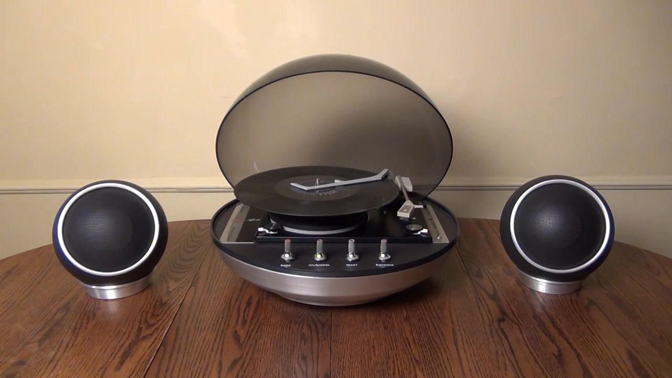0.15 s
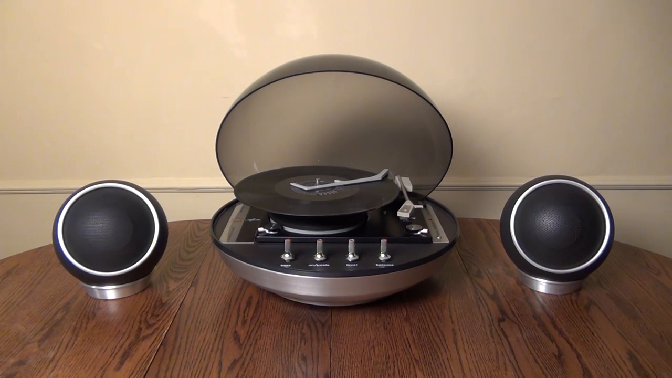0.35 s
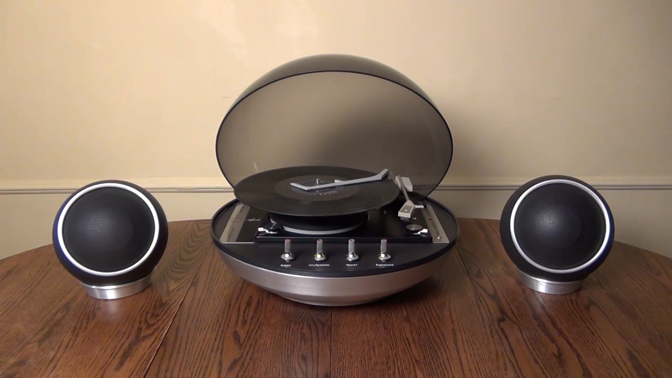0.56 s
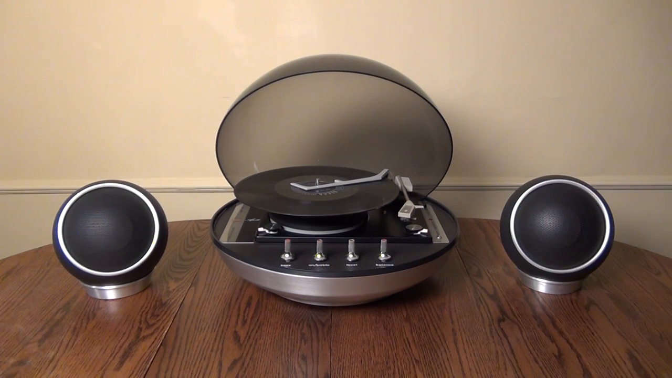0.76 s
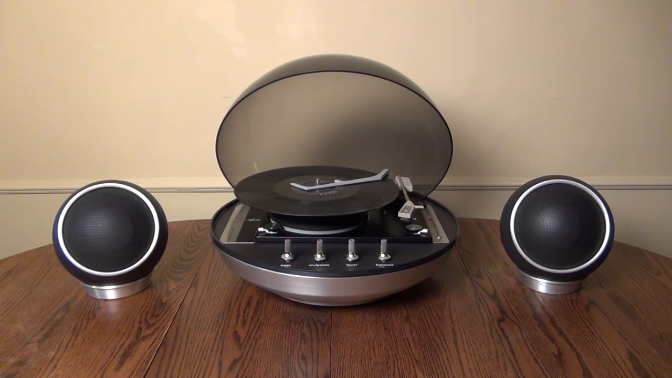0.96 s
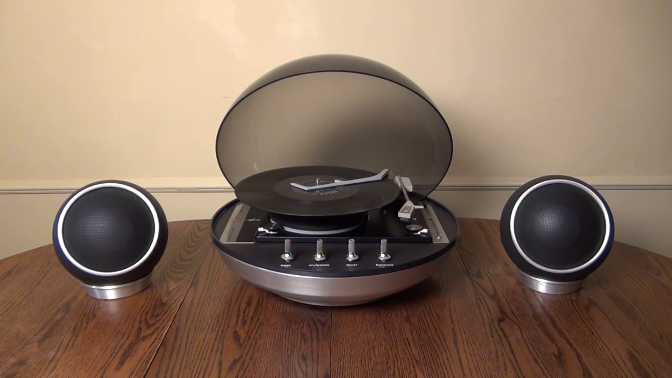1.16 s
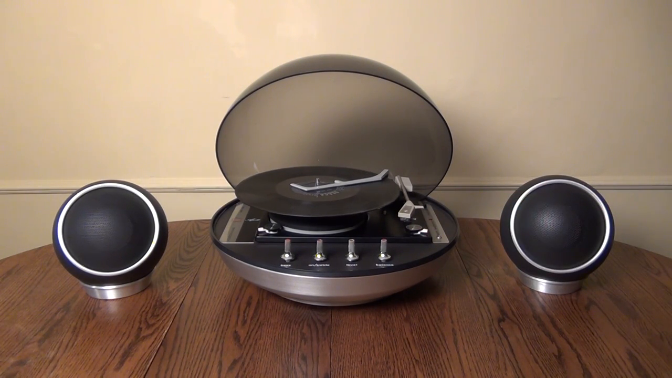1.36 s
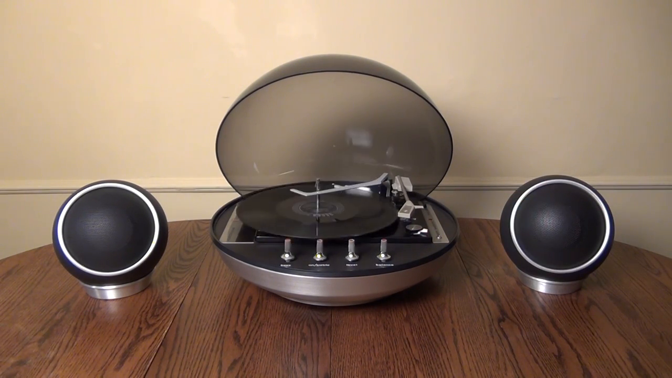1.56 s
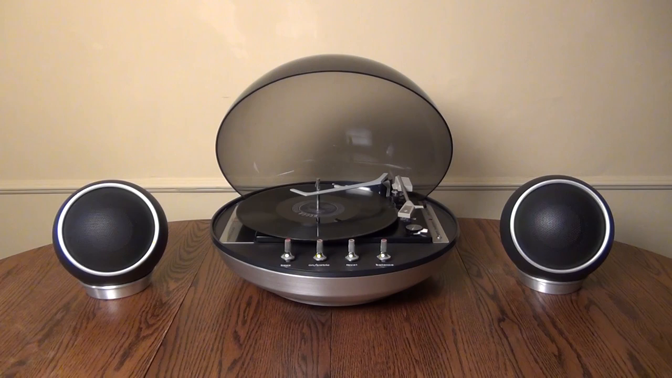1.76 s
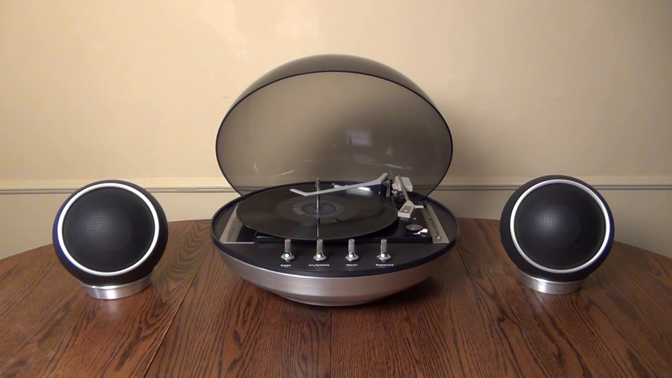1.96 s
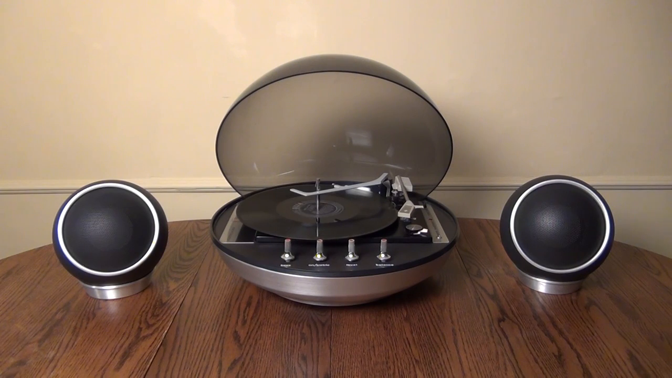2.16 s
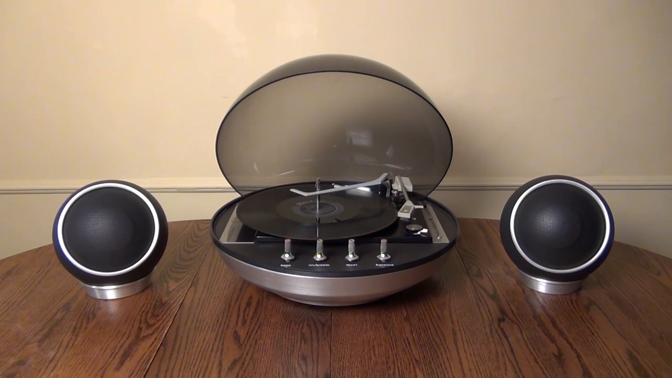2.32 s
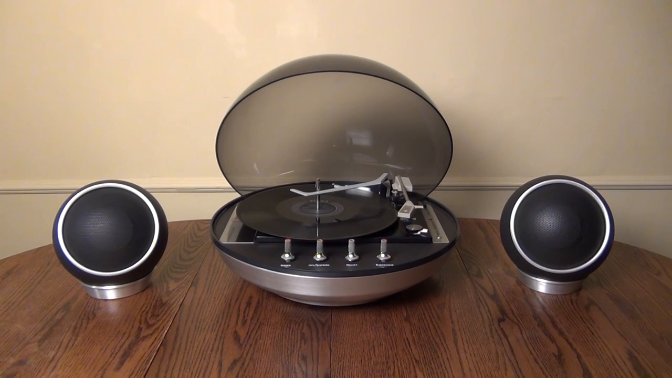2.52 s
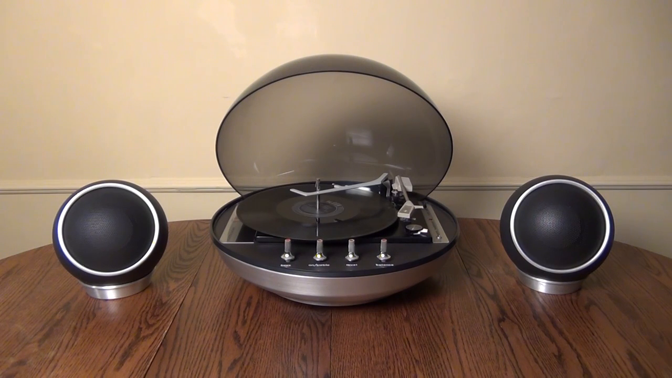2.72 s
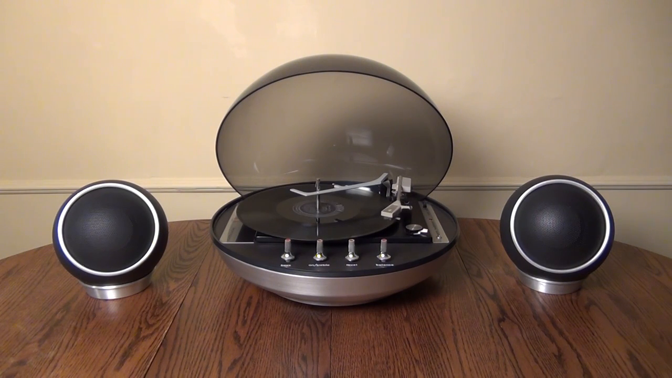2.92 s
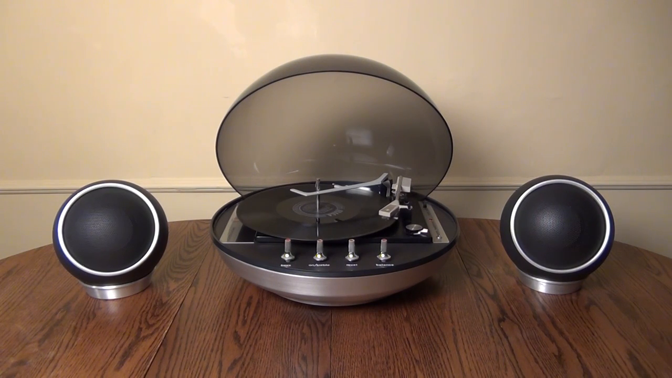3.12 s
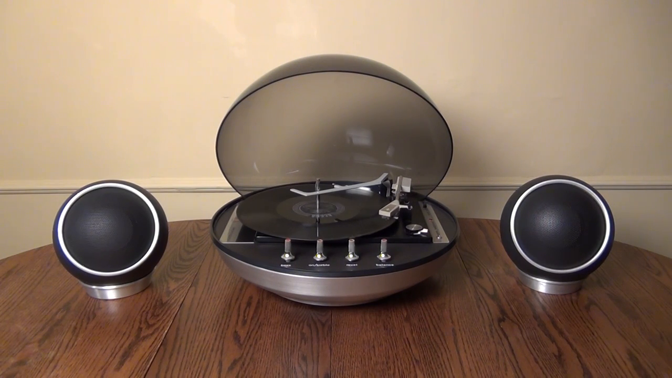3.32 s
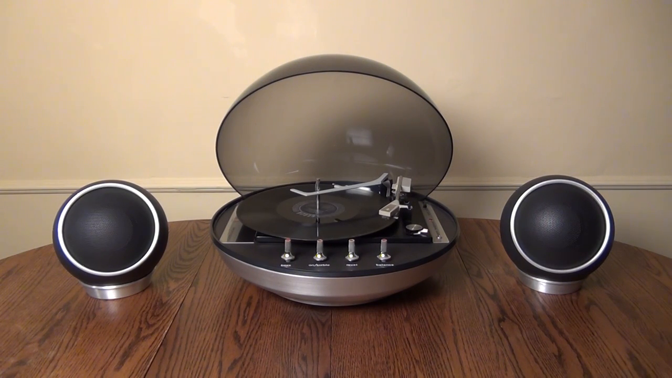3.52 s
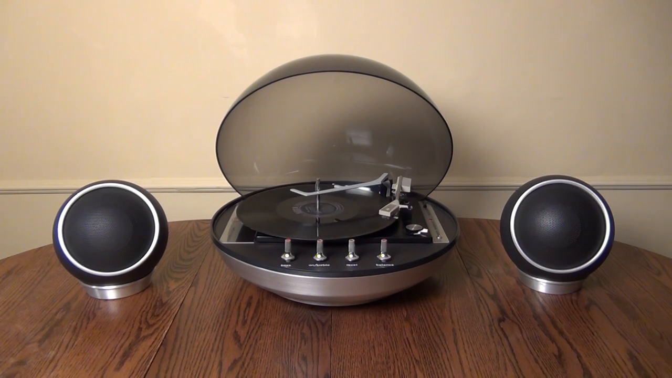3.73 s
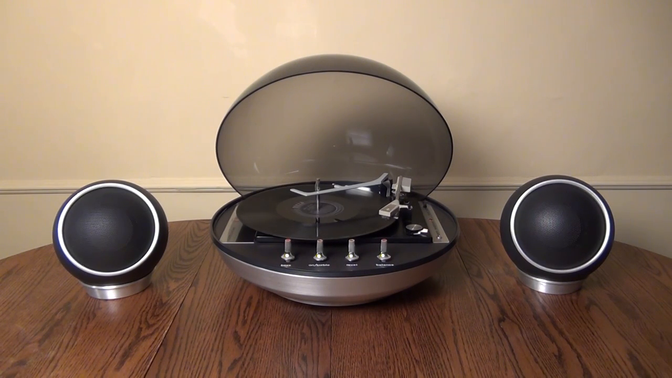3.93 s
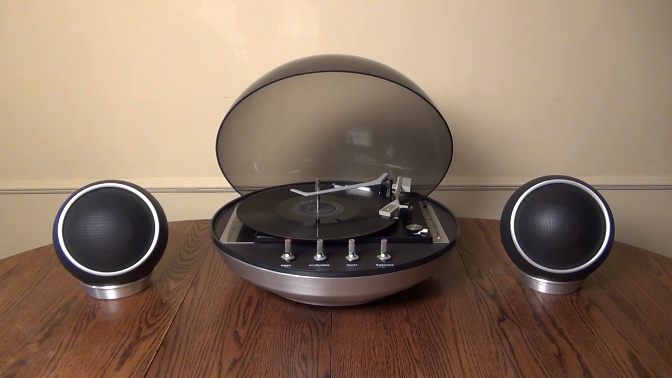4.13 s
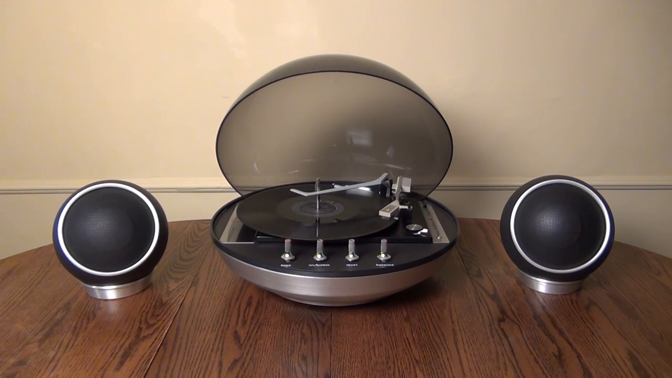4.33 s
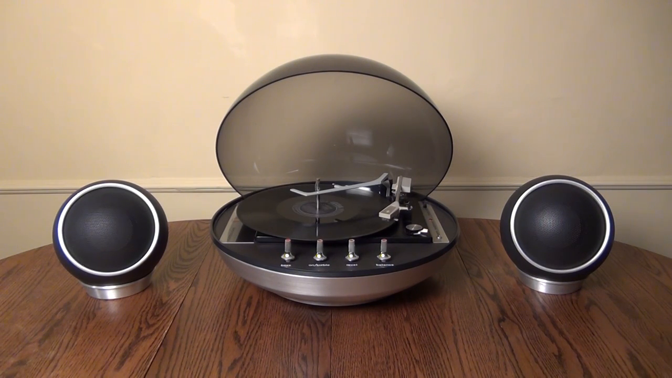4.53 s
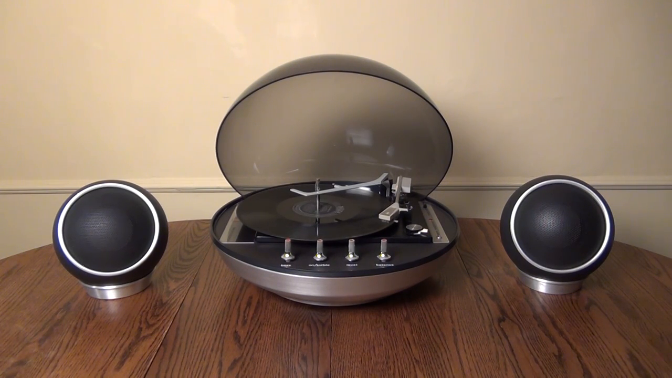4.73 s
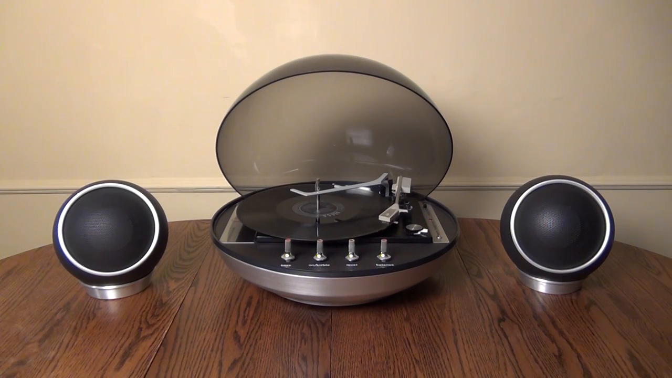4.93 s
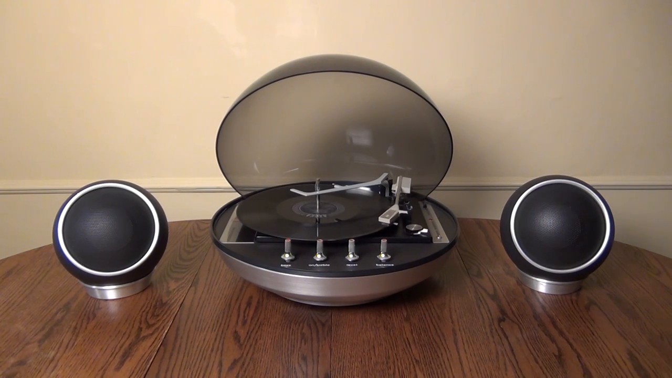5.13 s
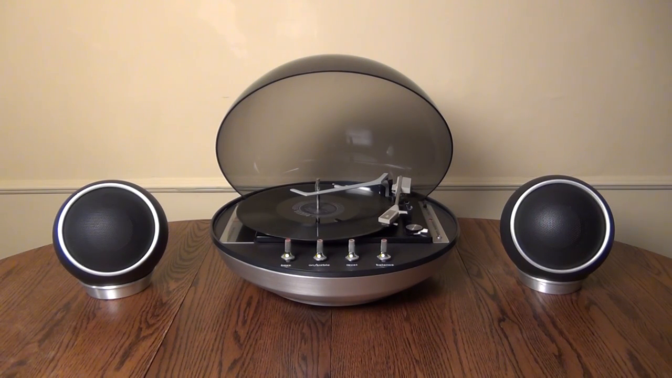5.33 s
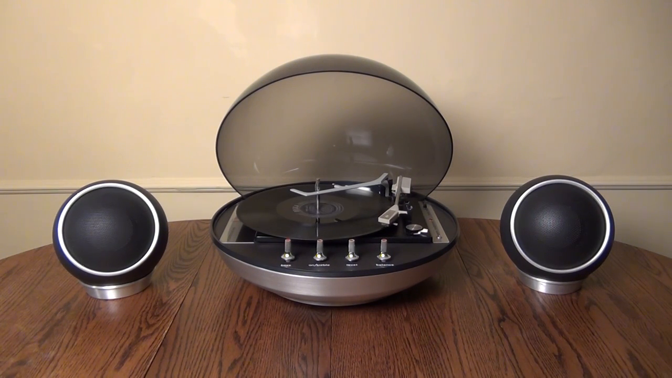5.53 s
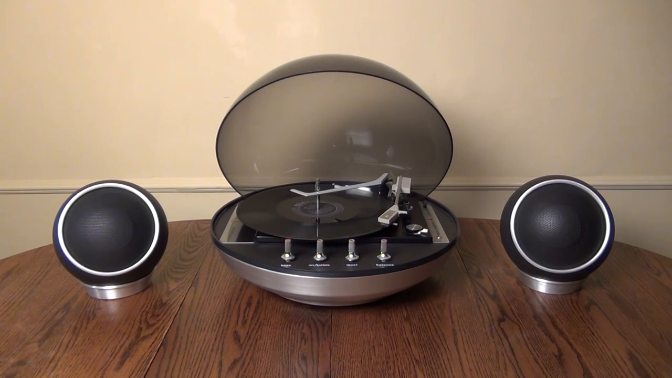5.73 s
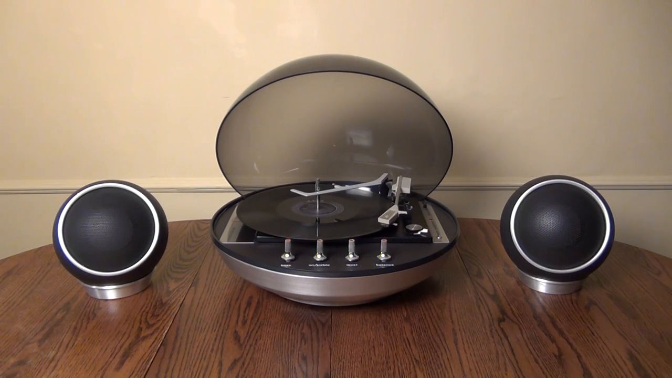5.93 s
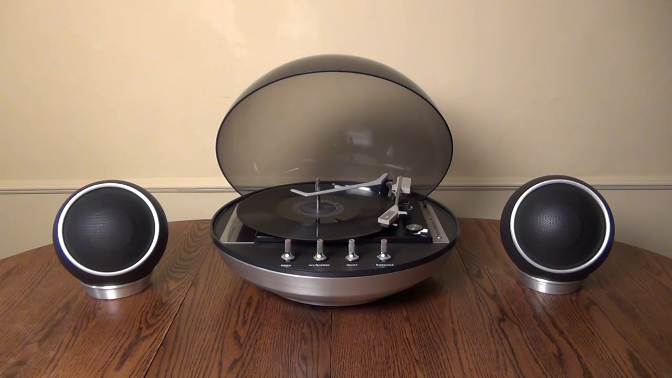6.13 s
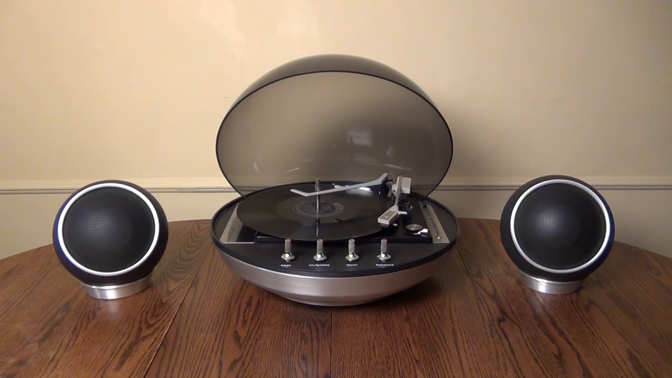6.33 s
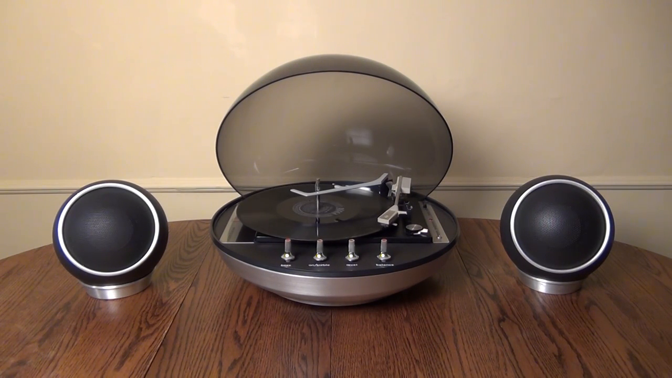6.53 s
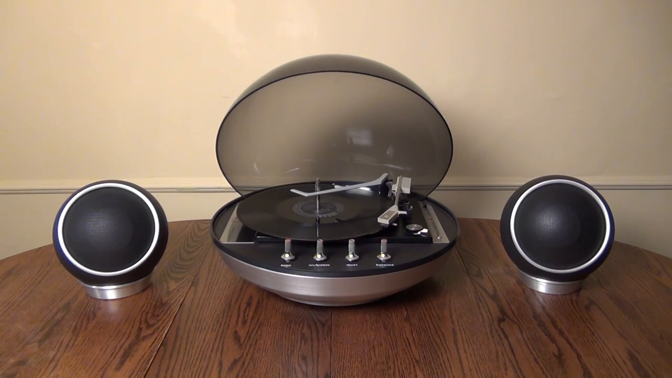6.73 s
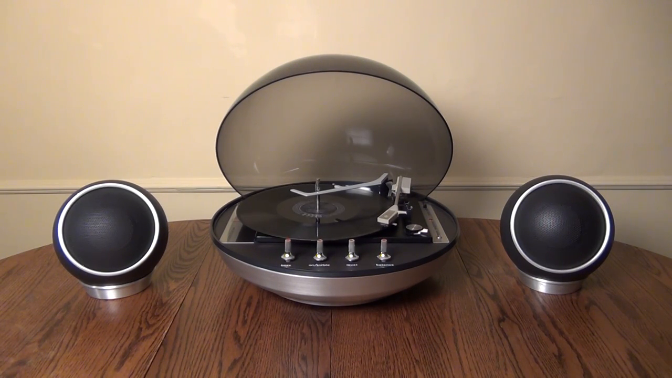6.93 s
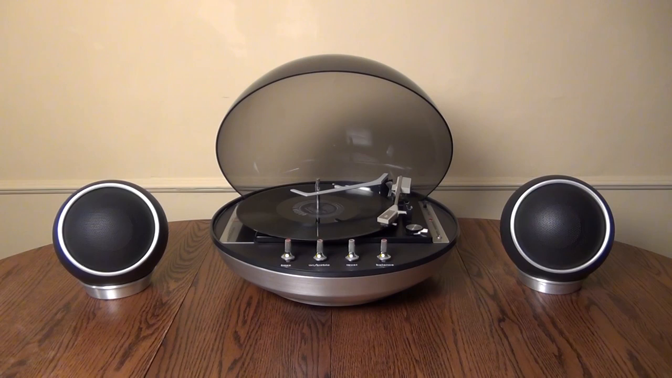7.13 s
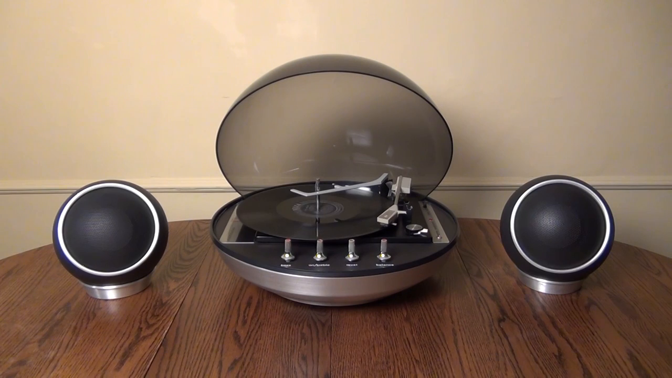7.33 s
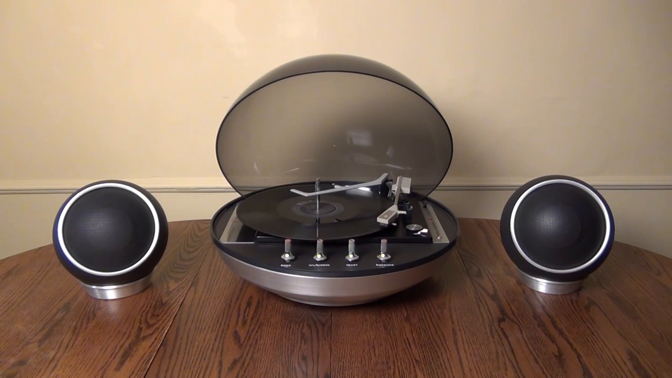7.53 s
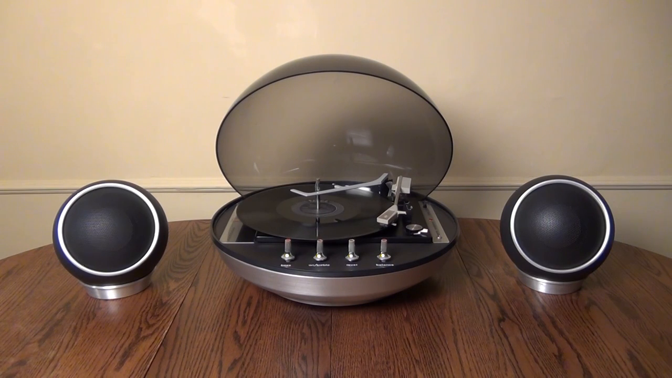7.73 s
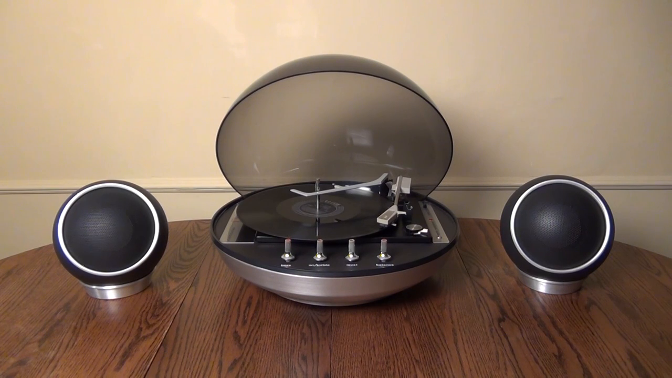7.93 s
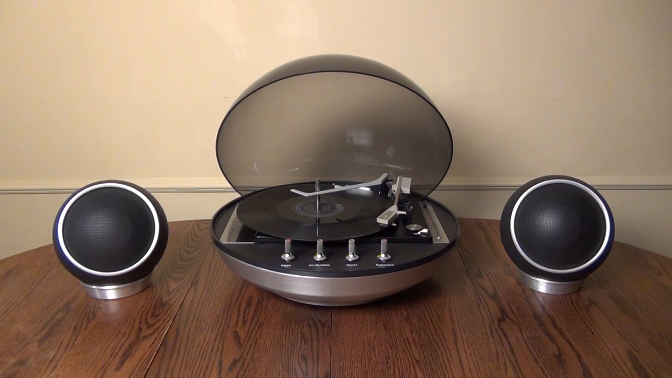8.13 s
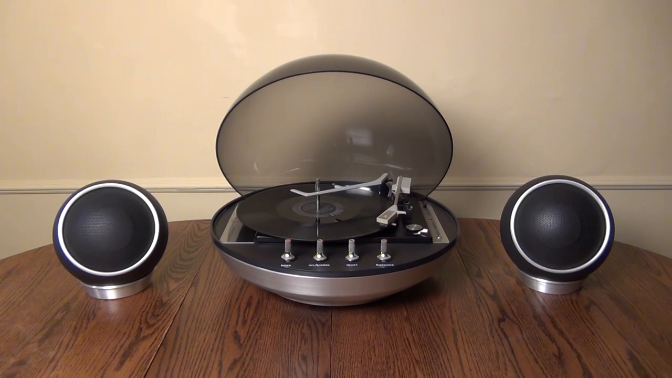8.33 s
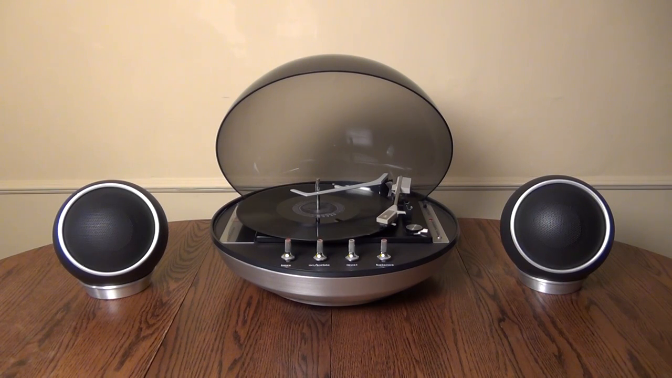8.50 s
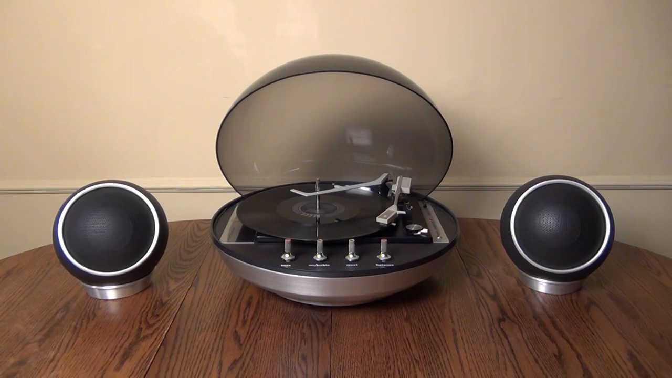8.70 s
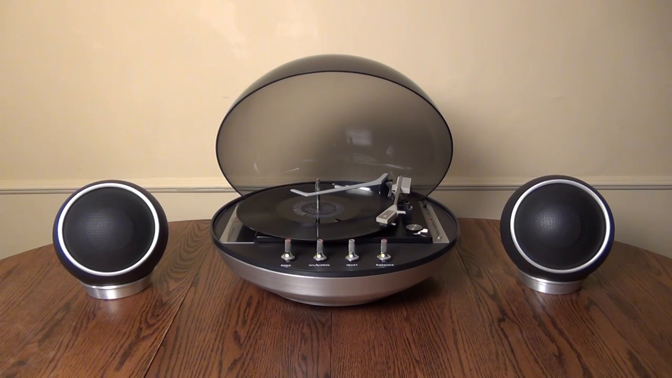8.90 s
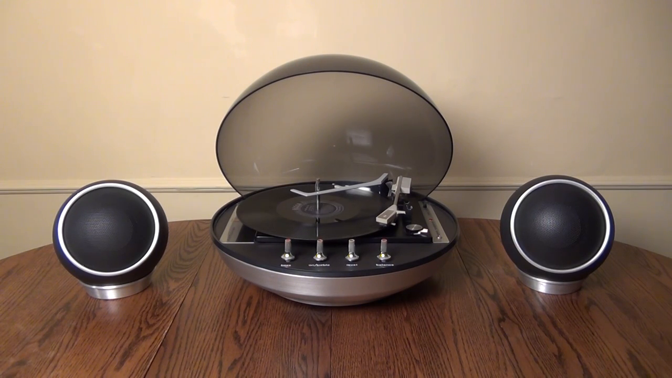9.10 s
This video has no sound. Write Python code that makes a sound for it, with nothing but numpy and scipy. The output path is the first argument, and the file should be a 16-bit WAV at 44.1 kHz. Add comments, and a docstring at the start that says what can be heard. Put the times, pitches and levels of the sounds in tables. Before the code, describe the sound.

A record changer hums, snaps, drops a record with a clatter, clicks through its cycle, then the stylus thumps down into crackling groove noise.

```python
"""An automatic record changer runs through its start cycle on a wooden table in a small room, heard in stereo.
Shaped noise bursts and decaying modes make its latch snap, cam levers click, record clatter and linkage clunk.
The stylus lands with a thump; impulses and dust grains crackle over groove noise from two small speakers.
Behind it all the motor hums in wavering sines, with filtered noise for the whirr of the bearings and a faint hiss.
The microphone thins the bass, and a limiter holds the loudest clatter down."""
import sys
import numpy as np
from scipy import signal
from scipy.fft import rfft, irfft
from scipy.io import wavfile
from scipy.ndimage import uniform_filter1d, minimum_filter1d

SR = 44100
rng = np.random.default_rng(int(sys.argv[2]) if len(sys.argv) > 2 else 0)


def dump_mix(stems):
    """Bounce the given channels to the path in sys.argv[1] as a 16-bit WAV at rate SR."""
    frames = np.atleast_2d(stems).T  # one column per channel
    limited = np.clip(frames, -1, 1)  # hard clip at full scale
    pcm = np.round(limited * 32767).astype(np.int16)
    wavfile.write(sys.argv[1], SR, pcm)


N = 403956
TIME = np.arange(N) / SR
BRIEF = TIME[:SR // 2]  # half a second, room for one blow or echo
EARS = np.array([[1], [-1]])  # left, right


def undb(db):
    """Decibels to gain."""
    return 10 ** (np.asarray(db) / 20)


def unit(x):
    """Scale to rms 1."""
    return x / np.sqrt(np.mean(x ** 2) + 1e-20)


def loudest(x, size=176):
    """Scale so that the loudest 4 ms have rms 1."""
    return x / np.sqrt(uniform_filter1d(x ** 2, size).max())


def along(points, hz):
    """Read (Hz, value) points on a log-frequency axis."""
    f, value = np.transpose(points)
    return np.interp(np.log(hz + 1), np.log(f), value)


def colour(x, points, tilt_db=0, size=4096):
    """Minimum-phase filter with the given spectrum, tilted about 2 kHz by tilt_db per octave."""
    hz = np.fft.rfftfreq(size, 1 / SR)
    octaves = np.log2(np.maximum(hz, 200) / 2000)  # the tilt stops below 200 Hz
    cepstrum = irfft(np.log(undb(along(points, hz) + tilt_db * octaves)))
    # folding the cepstrum forward in time makes the filter causal
    cepstrum[1:size // 2] *= 2
    cepstrum[size // 2 + 1:] = 0
    response = irfft(np.exp(rfft(cepstrum)))
    return signal.fftconvolve(x, response)[:len(x)]


def walk(rate):
    """Smooth random drift with a spread near 1, from about `rate` random steps a second."""
    k = max(int(SR / rate), 1)
    steps = np.repeat(rng.standard_normal(N // k + 1), k)
    return unit(uniform_filter1d(uniform_filter1d(steps, k), k)[:N])


def add(track, s, sound):
    """Mix a sound in at time s."""
    i = int(np.clip(s * SR, 0, N - 1))
    track[i:i + len(sound)] += sound[:N - i]


def fade(t60):
    """Exponential decay by 60 dB in t60 seconds."""
    return np.exp(-np.log(1000) * BRIEF / max(t60, 1e-4))


# The small room's reverberation. Each row: frequency in Hz, decay time T60 in s.
ROOM_T60 = [(150, 0.3), (600, 0.35), (3000, 0.3), (8000, 0.16), (15000, 0.25)]


def room(x, wet_db, early_db, early_t60, width):
    """Direct sound, quick reflections from lid and table, then the walls' tail, which dies at its own rate per band."""
    noise = rng.standard_normal((4, len(BRIEF)))
    hz = np.fft.rfftfreq(len(BRIEF), 1 / SR)
    times = np.array(ROOM_T60)
    tail = 0
    for share, t60 in zip(np.eye(len(times)), times[:, 1]):
        band = along(np.c_[times[:, 0], share], hz)
        tail = tail + irfft(rfft(noise[:2]) * band) * fade(t60)
    tail = tail * (1 - np.exp(-BRIEF / 0.0056))  # the tail builds up over some ms
    early = noise[2:] * fade(early_t60) * (BRIEF > .001)
    mid, side = (undb(wet_db) * late / np.linalg.norm(late) + undb(early_db) * first / np.linalg.norm(first)
                 for late, first in zip(tail, early))
    # mostly the middle frequencies differ between left and right: (Hz, dB)
    side_colour = [(100, -39), (250, -29), (1100, -3.0), (4500, -3.5), (8000, -17.5), (12000, -54)]
    side = colour(side, side_colour)
    centre = x + signal.fftconvolve(x, mid)[:N]
    return centre + EARS * width * signal.fftconvolve(x, side)[:N]


SHELL_T60_S = 0.27  # the chassis and lid ring on in countless close modes


def strikes(rows, spectrum, ring_t60, gain_db, rise_s, crack_db, shell_db=-24, modes=(), modes_db=0, grit_db=0):
    """Each blow: a bright crack, uneven micro-contacts that die into the shell's dense ring, and the part's own modes."""
    out = np.zeros(N)
    onset = 1 - np.exp(-BRIEF / rise_s)
    ring = sum(undb(modes_db + db) * np.sin(2 * np.pi * hz * BRIEF) * fade(t60) for hz, db, t60 in modes)
    decay = fade(ring_t60) + undb(shell_db) * fade(SHELL_T60_S)
    for s, db, tilt_db in rows:
        sizes = undb(grit_db * rng.standard_normal(len(BRIEF)))
        contacts = rng.choice([-1, 1], len(BRIEF)) * sizes
        burst = loudest(colour(contacts * onset * decay, spectrum, tilt_db))
        snap = rng.standard_normal(len(BRIEF)) * fade(0.008)
        crack = loudest(colour(snap, spectrum, tilt_db + 5.0))
        add(out, s, undb(db + gain_db) * (undb(crack_db) * crack + burst + onset * ring))
    return out


def chatter(s, db, gap_s, fall_db_per_s, tilt_db, uneven, count):
    """A loose part rebounds at uneven gaps, ever more weakly: rows of (s, level dB, treble tilt dB per octave)."""
    slip, force, edge = rng.standard_normal((count, 3)).T
    gaps = gap_s * np.exp(uneven * slip)
    late = np.cumsum(gaps) - gaps[0]
    return np.c_[s + late, db - fall_db_per_s * late + force, tilt_db + edge]


# The steady hum of motor and idler. Each row: frequency in Hz, relative level in dB.
HUM = [(242.2, -62.5), (393.0, -82), (414.5, -65), (473.7, -69.5), (586.8, -68.5), (834.4, -53.5),
       (882.9, -70), (952.8, -68), (1055, -69), (1674, -71.5)]
# Spectrum of the bearings' whirr. Each row: frequency in Hz, relative level in dB.
WHIRR = [(24, -52), (40, -15), (66, -21.5), (85, -72), (108, -16.5), (210, -15.5), (233, -10), (266, -10),
         (405, -7.5), (440, -16.5), (715, -8.5), (778, -13.5), (818, -10.5), (936, -11), (2200, -17.5),
         (2860, -57), (4840, -120)]
# Spectrum of the faint even hiss. Each row: frequency in Hz, relative level in dB.
HISS = [(1410, -35), (2400, -4), (3000, 1.5), (3400, -4.5), (3710, 0.5), (3830, -5.5), (16000, -14)]
WHIRR_DB, HISS_DB = -51, -61  # rms of the whirr about which it drifts, and of the hiss's middle


def motor():
    """Wavering motor and idler tones over the whirr of the bearings and a faint even hiss."""
    tones = 0
    for hz, db in HUM:
        level = undb(db + 1.37 * walk(6)) * np.sqrt(2)
        phase = 2 * np.pi * np.cumsum(hz + 1.6 * walk(14)) / SR
        tones = tones + level * np.sin(phase)
    whirr, spread = (unit(colour(rng.standard_normal(N), WHIRR)) for _ in range(2))
    spread = colour(spread, [(150, -56), (500, -17.0), (1200, -12)])  # the bass stays central
    hiss, hiss_spread = (unit(colour(rng.standard_normal(N), HISS)) for _ in range(2))
    hiss = hiss + EARS * undb(-15.0) * hiss_spread
    whirr_level = undb(WHIRR_DB + 0.48 * walk(10.0))
    return undb(1) * tones + whirr_level * (whirr + EARS * spread) + undb(HISS_DB) * hiss


# Scuffed stretches of the groove, from the worn rim inwards.
# Each row: start in seconds, length in seconds, relative noise level in dB.
SCUFFS = [(5.273, 0.67, -34.5), (6.129, .14, -34.5), (6.427, 0.784, -40), (6.812, 0.076, -33.5),
          (7.75, 0.24, -43), (8.224, .46, -45.5)]
SCUFF_ATTACK_S, SCUFF_RELEASE_S = 0.005, 0.081  # time constants
STYLUS_DOWN_S = 5.285
CLEAN_GROOVE_DB = -44.5  # relative noise level between the scuffs


def wear():
    """Strength of the groove noise: it swells on each scuff, holds, and dies back to that of the clean groove."""
    power = undb(CLEAN_GROOVE_DB) ** 2
    for s, length, db in SCUFFS:
        attack = 1 - np.exp(-np.maximum(TIME - s, 0) / SCUFF_ATTACK_S)
        release = np.exp(-np.maximum(TIME - s - length, 0) / SCUFF_RELEASE_S)
        power = power + (undb(db) * attack * release) ** 2
    return (TIME > STYLUS_DOWN_S) * np.sqrt(power)


def nicks(above_db, per_wear, spread_db, low_db, count):
    """Small scratches strewn along the groove, somewhat louder where it is worn: rows as for the deep ones."""
    place, size, width = rng.random((count, 3)).T
    s = STYLUS_DOWN_S + (np.arange(count) + place) / count * (TIME[-1] - STYLUS_DOWN_S)
    worn_db = 20 * np.log10(np.interp(s, TIME, wear()) + 1e-9) - CLEAN_GROOVE_DB
    db = CLEAN_GROOVE_DB + above_db + per_wear * worn_db + spread_db * (size - .5)
    return np.c_[s, db, low_db + 20 * (width - .5)]


# Low end of the groove noise. Each row: frequency in Hz, relative level in dB.
RUMBLE = [(53, -77), (90, -52), (99, -44), (114, -9), (157, -26.5), (238, 1.5), (335, -0.5), (370, -10),
          (710, -2.5), (1180, -14), (1270, -4.5), (1700, -11.5), (2210, -37), (3740, -120)]
# Treble response of the two small speakers' cones. Each row: frequency in Hz, relative level in dB.
SPEAKER = [(820, -38), (1400, -4.5), (1670, -4.5), (2230, -2), (2660, -14.5), (2940, -2), (3120, 2),
           (3500, -3), (4410, -16.5), (5170, -7), (6490, -11), (7190, -15.5), (8150, -15), (10500, -33),
           (13600, -65), (22000, -120)]


def groove(dust_rate, scatter_db, clump_db):
    """Patches of dust grains of very uneven size tick over the hiss and rumble of the groove wall."""
    density = dust_rate * undb(clump_db * walk(25))  # grains per second
    size = undb(scatter_db * np.minimum(rng.exponential(size=N), 3.4))
    grains = unit((rng.random(N) < density / SR) * size * rng.choice([-1, 1], N))
    crackle = undb(-5.5) * unit(colour(grains, SPEAKER, tilt_db=3.5))
    hiss = undb(-5.5) * unit(colour(rng.standard_normal(N), SPEAKER, tilt_db=-0.5))
    rumble = undb(-7.5 + 1.66 * walk(12)) * unit(colour(grains + rng.standard_normal(N), RUMBLE))
    return wear() * undb(0.91 * walk(11)) * (crackle + hiss + rumble)


# The deepest scratches in the groove.
# Each row: start in seconds, relative level in dB, relative low-mid against treble in dB.
POPS = [(5.301, -14.5, -17), (5.42, -10.5, -4.5), (5.562, -14.5, -17), (5.777, -16, -13),
        (6.091, -21.5, -6), (6.149, -18.5, -5), (6.432, -20.5, -31), (6.712, -20, -13), (6.865, -17.5, -6),
        (7.085, -20, 8), (7.166, -17, -32), (7.249, -19.5, -16), (7.735, -23.5, -28), (8.094, -25, -8),
        (8.393, -22, -28), (8.837, -19, -9), (8.966, -22, -18), (8.996, -20, -17), (9.101, -11, 1)]
# The cones' answer to a wide scratch. Each row: frequency in Hz, relative level in dB.
CONE_BODY = [(120, -37), (200, -4), (720, 5), (805, 1.5), (877, -0.5), (2100, 6.5), (2720, -9), (3040, 3),
             (3800, -15.5), (4940, -64), (8360, -120)]


def pops(gain_db, body_db, flight_s):
    """A scratch jolts the stylus once; a wide one also pushes the whole cone."""
    out = np.zeros(N)
    jolt = 1. * (BRIEF == 0)
    tick = loudest(colour(jolt, SPEAKER, tilt_db=1.0))
    body = loudest(colour(jolt, CONE_BODY))
    small = nicks(above_db=15.0, per_wear=0.73, spread_db=9, low_db=-19, count=32)
    for s, db, low_db in np.vstack([POPS, small]):
        pop = loudest(tick + undb(low_db + body_db) * body)
        add(out, s + flight_s, undb(db + gain_db) * pop)
    return out


# The stylus touches, skips and lands.
# Each row: start in seconds, relative level in dB, treble tilt in dB per octave.
LANDING = [(5.286, -37, 2), (5.306, -24, 9.5), (5.337, -19.5, 3.5)]
# Spectrum of the landing thump. Each row: frequency in Hz, relative level in dB.
THUMP_COLOUR = [(47, -47), (85, -48), (125, -16), (285, 7), (395, -8.5), (780, -14), (1010, -37),
                (1160, -29), (1200, -12), (1560, -39), (2640, -120)]
# Woofers in their round cabinets. Each row: frequency in Hz, relative level in dB, decay time T60 in s.
CONE_MODES = [(124, -6.5, 0.44), (272, 0, .12)]


def landing():
    """The stylus meets the record in dull thumps that ring the woofers."""
    return strikes(LANDING, THUMP_COLOUR, ring_t60=0.12, gain_db=-7.0, rise_s=0.0037, crack_db=-16,
                   modes=CONE_MODES, modes_db=-10)


SPEAKER_TOP_HZ = 12100


def speakers():
    """All that the stylus picks up, played into the room by cones that give out in the top octave."""
    scratches = pops(gain_db=-5.5, body_db=9.5, flight_s=0.001294)
    sound = landing() + scratches + groove(dust_rate=380, scatter_db=5.5, clump_db=5)
    cone_limit = signal.ellip(6, 1, 45, SPEAKER_TOP_HZ, fs=SR, output="sos")
    sound = signal.sosfilt(cone_limit, sound)
    return room(sound, wet_db=-6.0, early_db=-6, early_t60=0.036, width=0.4)


# Dull knocks of the drive in the plinth.
# Each row: start in seconds, relative level in dB, treble tilt in dB per octave.
KNOCKS = [(0.546, -28, 0.5), (1.344, -28.5, -1), (1.438, -22, 0.5), (2.821, -39, -3.5),
          (3.054, -30.5, -0.5), (3.241, -27, 2), (4.417, -36, -10), (4.883, -37, -0.5)]
# Spectrum of a knock. Each row: frequency in Hz, relative level in dB.
KNOCK_COLOUR = [(71, -56), (120, -16.5), (445, 2), (629, 3.5), (720, -9), (1440, -5.5), (2570, -19),
                (3180, -19), (12000, -41.5), (15600, -65), (22000, -120)]


def drive_knocks():
    """The drive knocks dully in the plinth, with much of the shell's ring and no modes of its own."""
    return strikes(KNOCKS, KNOCK_COLOUR, ring_t60=0.079, gain_db=-5.5, rise_s=0.0019, crack_db=-7.5, shell_db=-5.5)


# Cam levers that lift and swing the arm. Each row: start in seconds, relative level in dB.
LEVERS = [(2.3339, -35), (2.373, -24.5), (2.5524, -11.5), (3.0856, -21), (3.1072, -27.5), (3.257, -10),
          (3.901, -27), (3.9985, -12)]
# Spectrum of a lever click. Each row: frequency in Hz, relative level in dB.
LEVER_COLOUR = [(88, -57), (150, -24), (297, -4), (624, -14.5), (774, -22), (1450, -2), (1660, -7.5),
                (2020, 4.5), (3040, -15), (3700, -9.5), (4000, -17), (6260, -30), (8230, -26),
                (11700, -47.5), (16000, -72)]
# The levers' own ring. Each row: frequency in Hz, relative level in dB, decay time T60 in s.
LEVER_MODES = [(2070, -0.5, 0.02), (2247, -2.5, 0.03), (3690, -15, 0.034)]
LEVER_TILT_DB, BRIGHTER_PER_DB = 4.5, 0.18  # treble tilt (dB per octave) of a 0 dB blow; its change per dB


def cam_levers():
    """Cam levers click with a short ring; softer blows are duller."""
    throws = [(s, db, LEVER_TILT_DB + BRIGHTER_PER_DB * db) for s, db in LEVERS]
    return strikes(throws, LEVER_COLOUR, ring_t60=0.039, gain_db=-6.5, rise_s=0.0014, crack_db=-6,
                   shell_db=-16.5, modes=LEVER_MODES, modes_db=6.0, grit_db=3)


# Spindle latch and light metal pawls.
# Each row: start in seconds, relative level in dB, treble tilt in dB per octave.
LATCH = [(1.1074, -20, 2.5), (1.1135, -4.5, 1), (3.24, -34, -8), (3.3044, -27, -5.5), (3.9913, -25, -4),
         (4.4176, -22, -1.5), (4.883, -21.5, 0.5), (4.9884, -31.5, 1.5), (5.0576, -37.5, -4),
         (5.6455, -23, 1)]
# Spectrum of a latch snap. Each row: frequency in Hz, relative level in dB.
LATCH_COLOUR = [(88, -74), (150, -37), (249, -9.5), (702, -6), (821, 0), (1500, -8), (1940, -2.5),
                (2360, -5), (3490, -1.5), (8070, -3), (16000, -19.5)]
# The latch's own ring. Each row: frequency in Hz, relative level in dB, decay time T60 in s.
LATCH_MODES = [(825, -2.5, .27), (1016, -3.5, 0.21), (3295, 1, 0.2), (4980, -3, 0.22), (8280, -1, 0.12),
               (11700, -1, .17)]


def spindle_latch():
    """The latch and light metal pawls snap in short, gritty bursts."""
    return strikes(LATCH, LATCH_COLOUR, ring_t60=0.021, gain_db=-8, rise_s=0.0012, crack_db=-2.5,
                   shell_db=-14, modes=LATCH_MODES, modes_db=-15.5, grit_db=8.0)


# The record slides down the spindle and slaps the platter.
# Each row: start in seconds, relative level in dB, treble tilt in dB per octave.
SLAPS = [(1.457, -18, 7), (1.464, -13.5, 1.5), (1.485, -6, 1.5), (1.505, -7, 7.5), (1.526, -8, 2),
         (1.644, -8.5, 1), (1.71, -19, -3)]
# Spectrum of a slap. Each row: frequency in Hz, relative level in dB.
SLAP_COLOUR = [(24, -76), (40, -56), (90, -50), (127, -28), (189, -17), (312, 3.5), (392, -11), (503, -8),
               (630, -7.5), (873, -6), (1090, -7), (1950, -9), (2980, -15), (7930, -21.5), (16000, -44.5)]
# The platter's own ring. Each row: frequency in Hz, relative level in dB, decay time T60 in s.
PLATTER_MODES = [(131.2, -11.5, 0.52), (290, -7, .22), (323, -1, 0.25), (514, -4, 0.16), (721, -3, 0.25),
                 (889, -0.5, 0.33), (1320, -7, 0.19), (1490, -3, 0.15), (1610, -12, 0.28), (1989, -5, 0.35)]
WOBBLE_S, WOBBLE_DB = 1.538, -5  # start and relative level


def falling_record():
    """The record slaps the platter, which rings, then wobbles flat in ever weaker rebounds."""
    wobble = chatter(WOBBLE_S, WOBBLE_DB, gap_s=.013, fall_db_per_s=72, tilt_db=0, uneven=.2, count=8)
    return strikes(np.vstack([SLAPS, wobble]), SLAP_COLOUR, ring_t60=0.059, gain_db=-10.5, rise_s=0.001,
                   crack_db=-0.5, shell_db=-7.0, modes=PLATTER_MODES, modes_db=-11.5, grit_db=5.5)


# Spectrum of the closing clunk. Each row: frequency in Hz, relative level in dB.
CLUNK_COLOUR = [(24, -67), (40, -56), (90, -55), (130, -38), (269, 4), (382, -11), (455, 0.5), (663, -11),
                (1210, -11.5), (1440, -5), (1850, -8.5), (2770, -1.5), (3470, -8), (5050, -4.5),
                (7930, -12), (16000, -36)]
# The chassis' own ring. Each row: frequency in Hz, relative level in dB, decay time T60 in s.
CHASSIS_MODES = [(257, -10, 0.21), (313, 0, 0.17), (439, -2, 0.18), (1524, -7, 0.17), (2700, -3, 0.32),
                 (5006, 0.5, 0.19), (5100, -11, .18)]
CLUNK_S, CLUNK_DB = 5.661, -2  # start and relative level


def closing_clunk():
    """The sprung linkage drops out of gear and chatters, ringing the chassis."""
    rebounds = chatter(CLUNK_S, CLUNK_DB, gap_s=.0105, fall_db_per_s=172, tilt_db=0, uneven=.12, count=6)
    return strikes(rebounds, CLUNK_COLOUR, ring_t60=0.043, gain_db=-10, rise_s=0.001, crack_db=-1,
                   shell_db=-10.5, modes=CHASSIS_MODES, modes_db=-12.0, grit_db=6.5)


def changer():
    """All blows of the mechanism share one spot in the room."""
    blows = drive_knocks() + cam_levers() + spindle_latch() + falling_record() + closing_clunk()
    return room(blows, wet_db=-11, early_db=-8.5, early_t60=0.062, width=0.61)


def scene():
    """The whole scene stands a little left of centre."""
    return (motor() + speakers() + changer()) * undb(.25 * EARS)


LIMIT, TOP_HZ = .56, 15900  # limiter's peak level (full scale 1); edge of the treble cut


def record(dry):
    """The microphone thins the bass, a look-ahead limiter holds the loudest clatter down, and the top is cut."""
    bass_cut = signal.butter(2, 75, "highpass", fs=SR, output="sos")
    sound = signal.sosfilt(bass_cut, dry)
    gain = np.minimum(1, LIMIT / (np.abs(sound).max(axis=0) + 1e-9))
    gain = uniform_filter1d(minimum_filter1d(gain, size=331), size=331)  # 7.5 ms windows
    top_cut = signal.ellip(10, .2, 80, TOP_HZ, fs=SR, output="sos")
    return signal.sosfilt(top_cut, sound * gain)


dry = scene()
out = record(dry)
dump_mix(out)
```